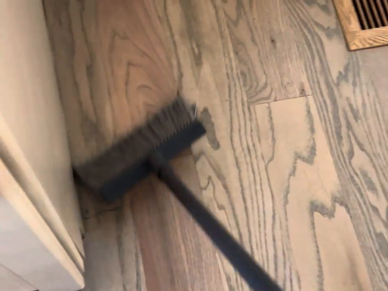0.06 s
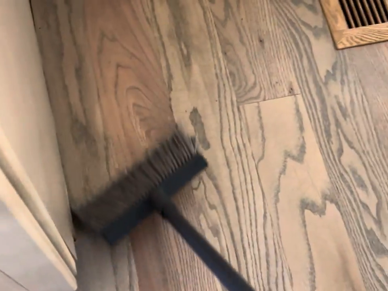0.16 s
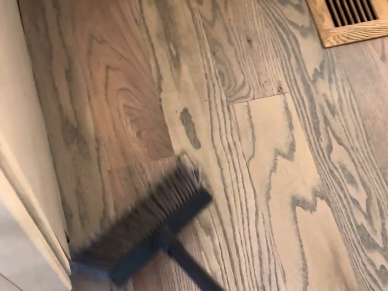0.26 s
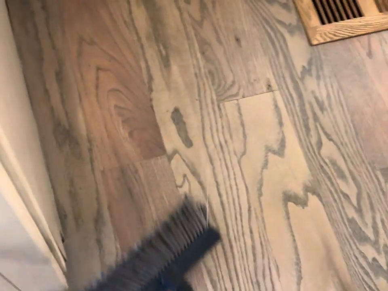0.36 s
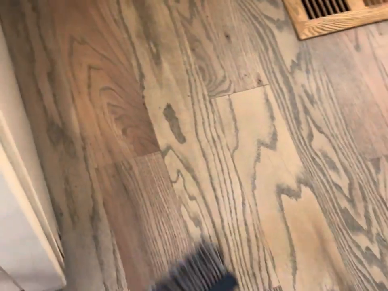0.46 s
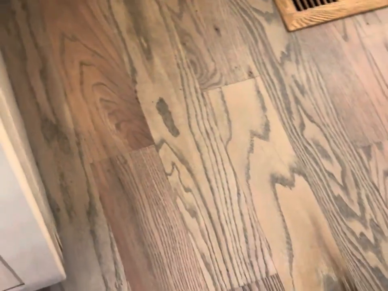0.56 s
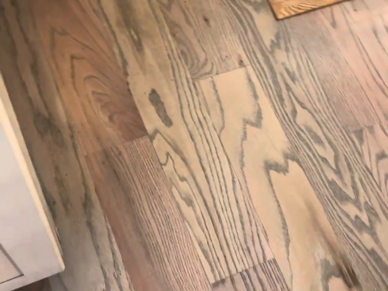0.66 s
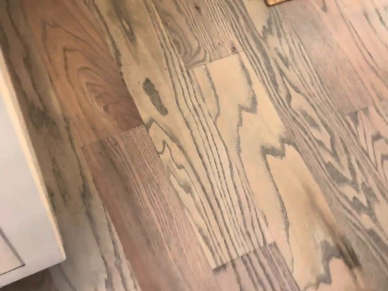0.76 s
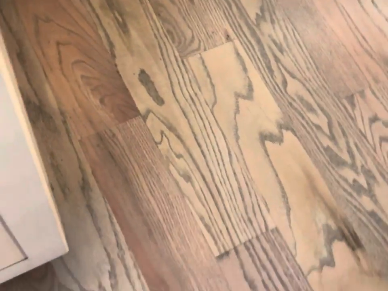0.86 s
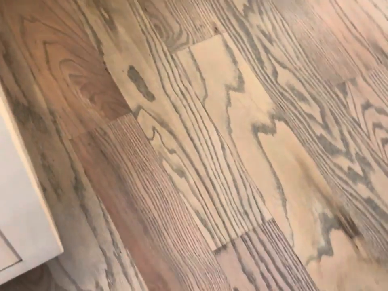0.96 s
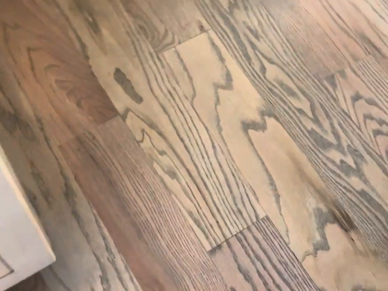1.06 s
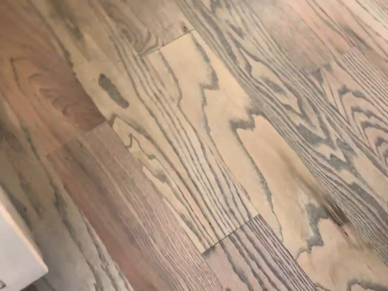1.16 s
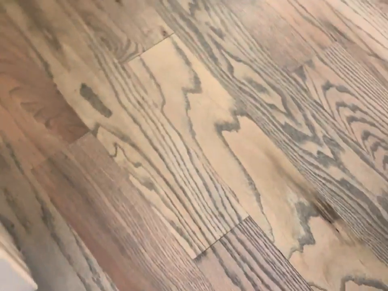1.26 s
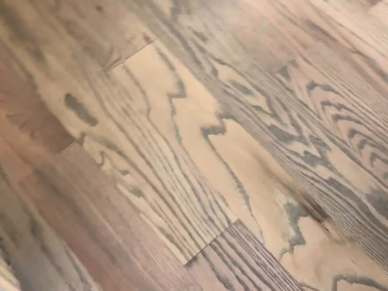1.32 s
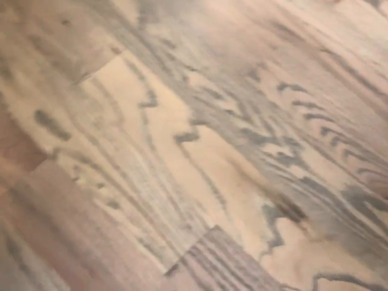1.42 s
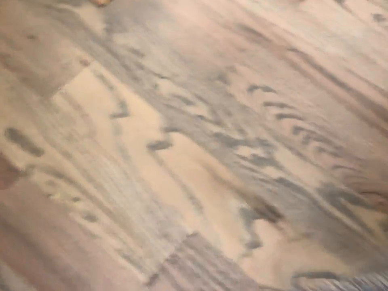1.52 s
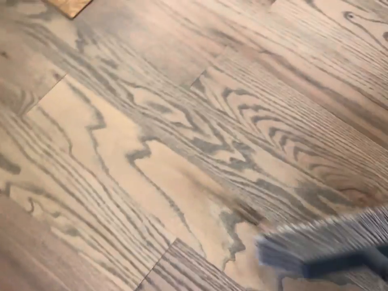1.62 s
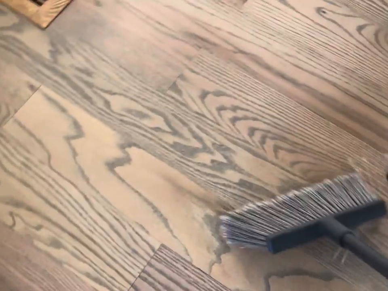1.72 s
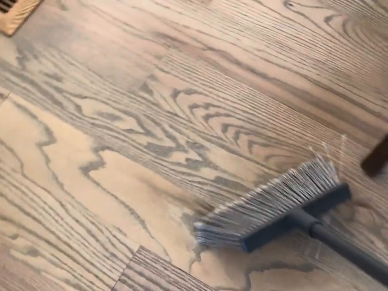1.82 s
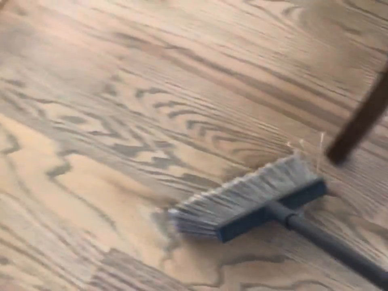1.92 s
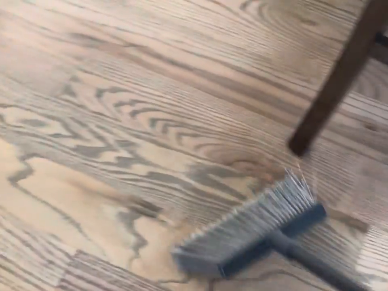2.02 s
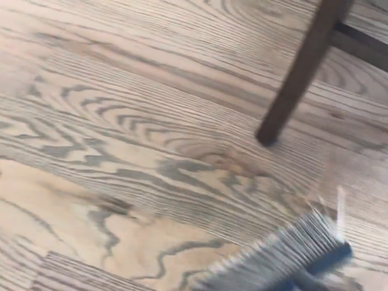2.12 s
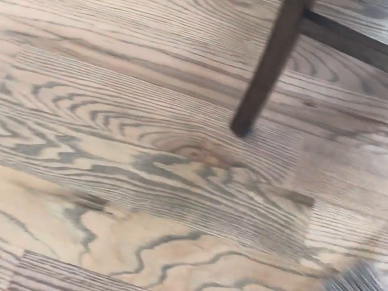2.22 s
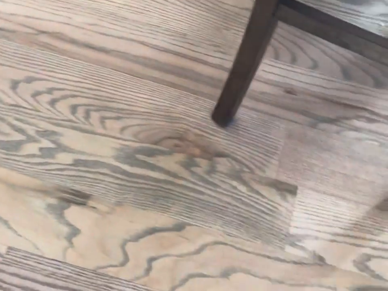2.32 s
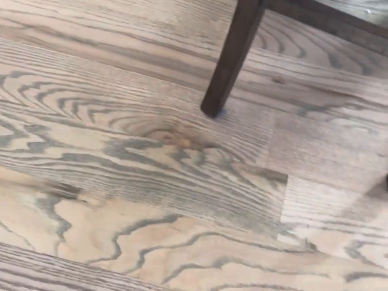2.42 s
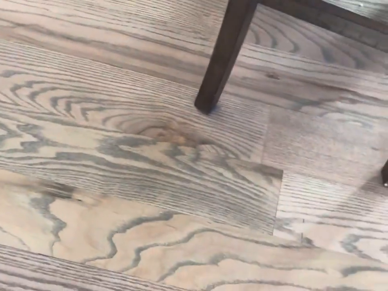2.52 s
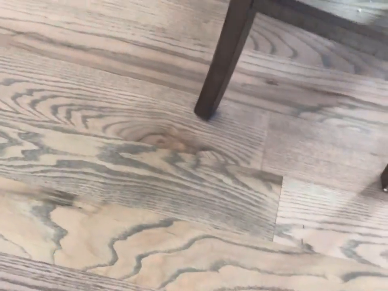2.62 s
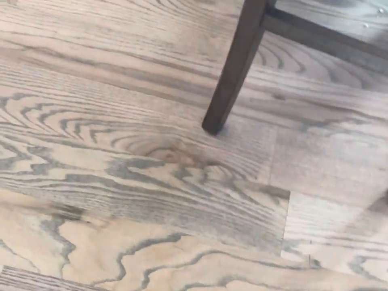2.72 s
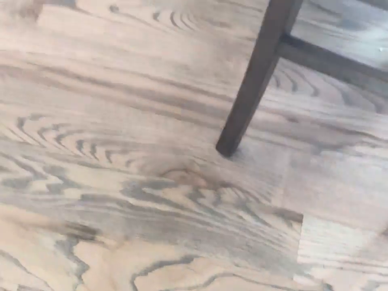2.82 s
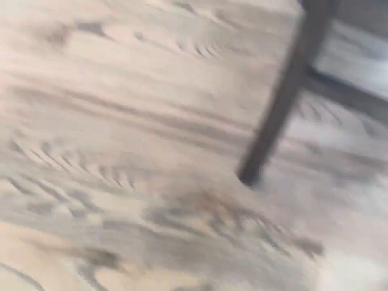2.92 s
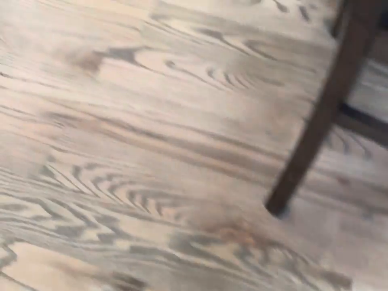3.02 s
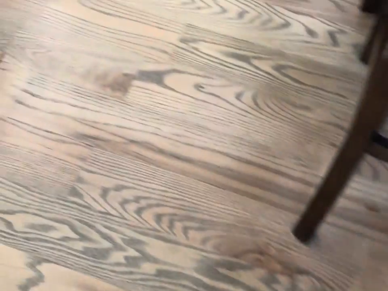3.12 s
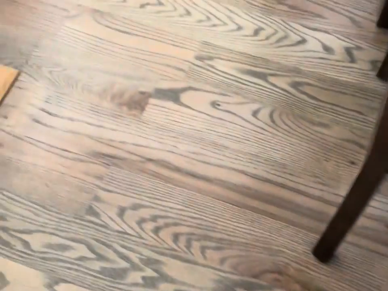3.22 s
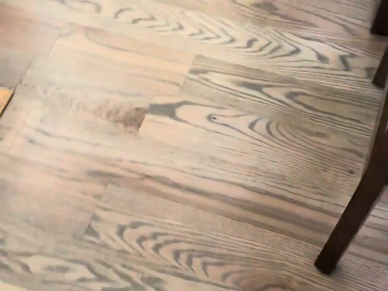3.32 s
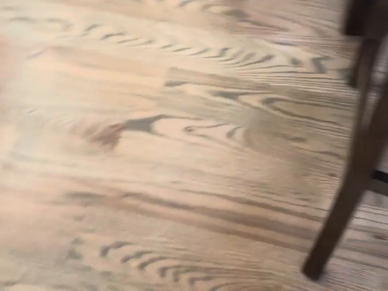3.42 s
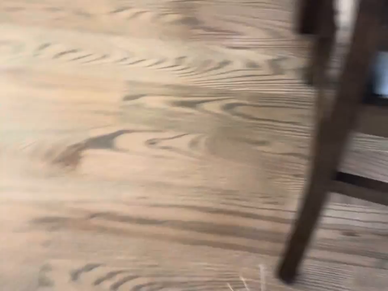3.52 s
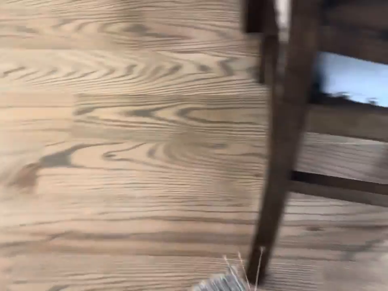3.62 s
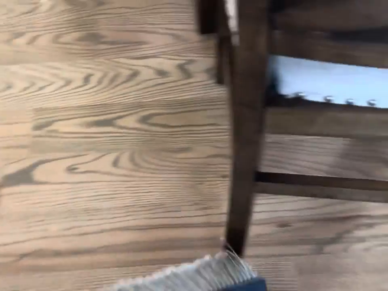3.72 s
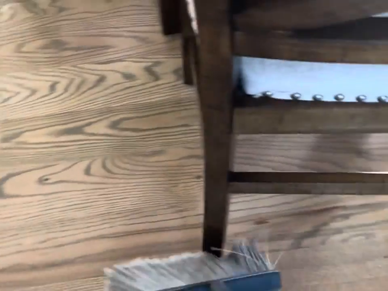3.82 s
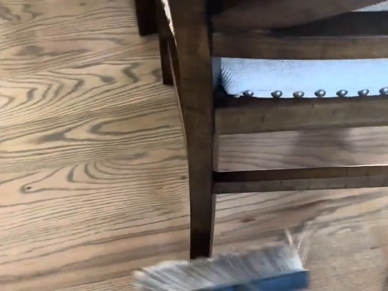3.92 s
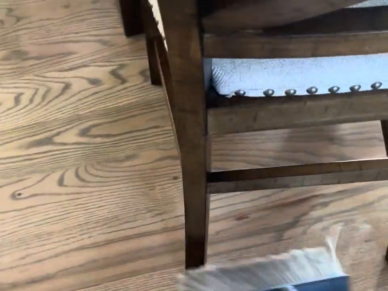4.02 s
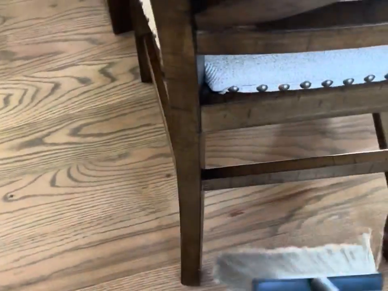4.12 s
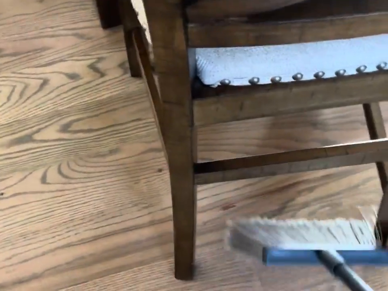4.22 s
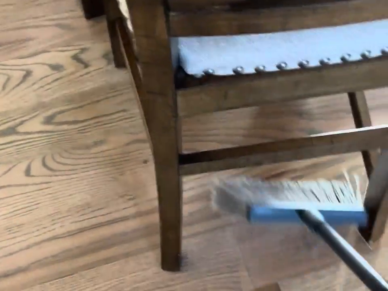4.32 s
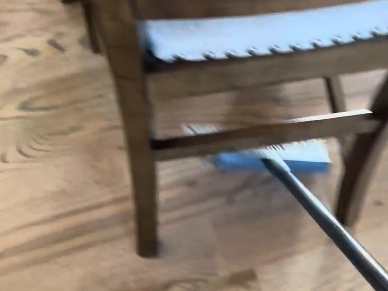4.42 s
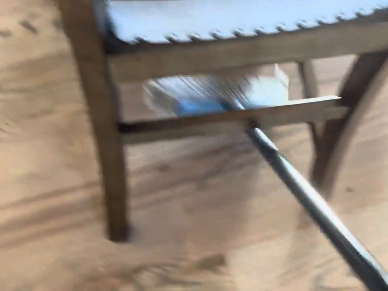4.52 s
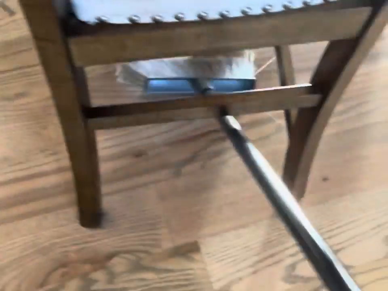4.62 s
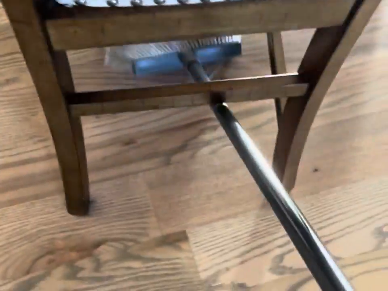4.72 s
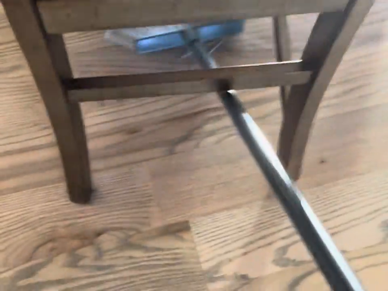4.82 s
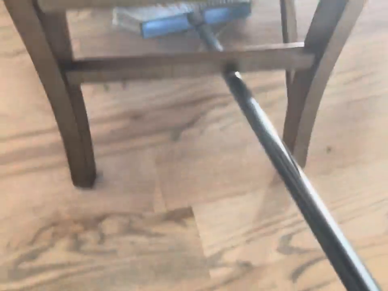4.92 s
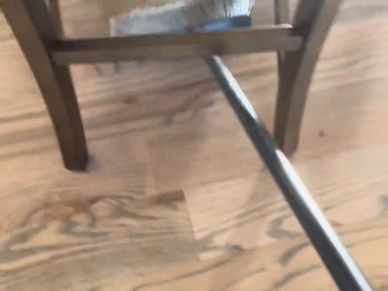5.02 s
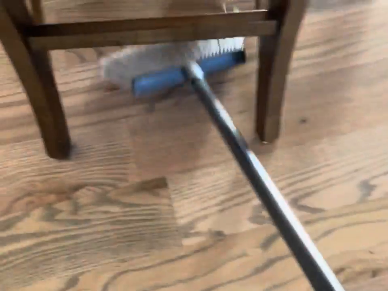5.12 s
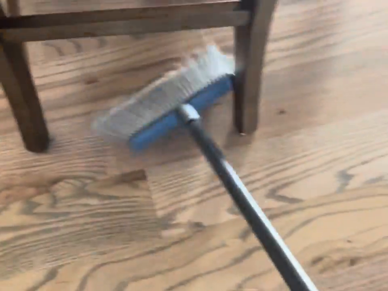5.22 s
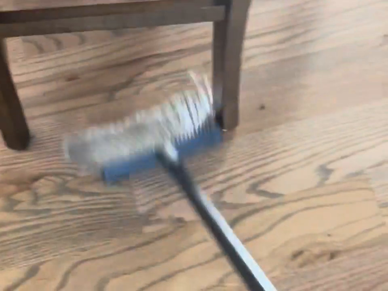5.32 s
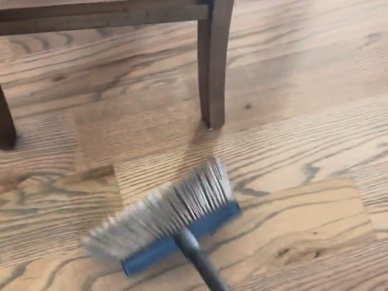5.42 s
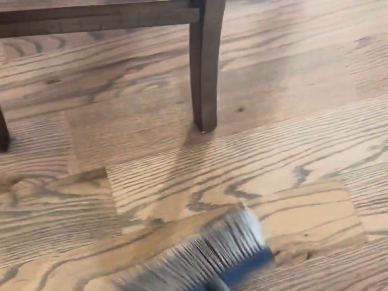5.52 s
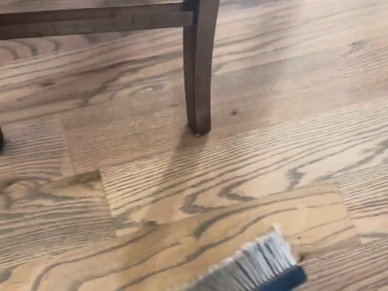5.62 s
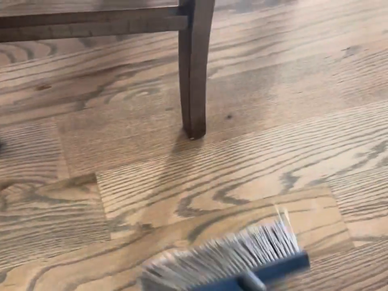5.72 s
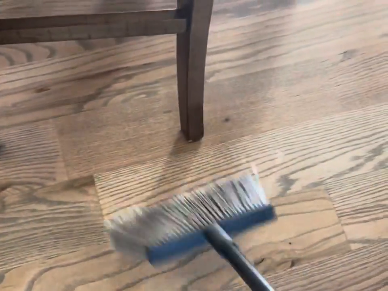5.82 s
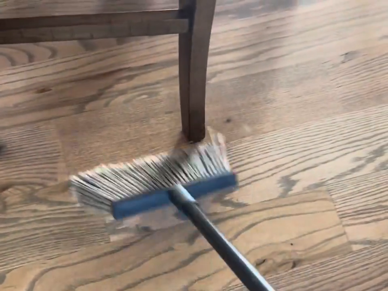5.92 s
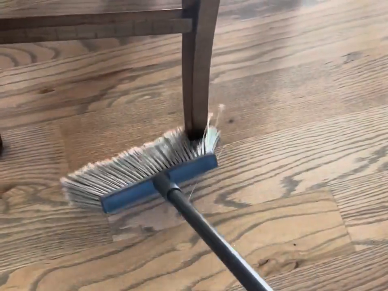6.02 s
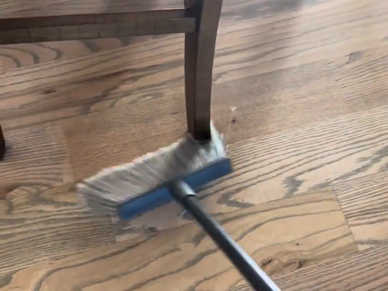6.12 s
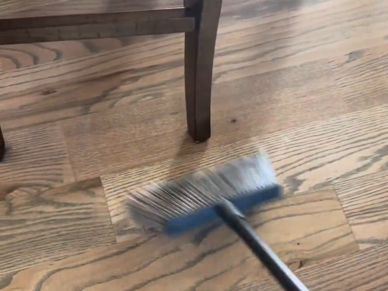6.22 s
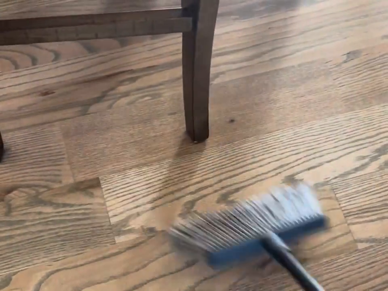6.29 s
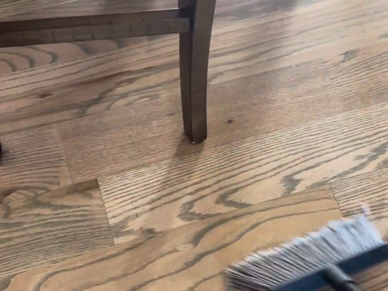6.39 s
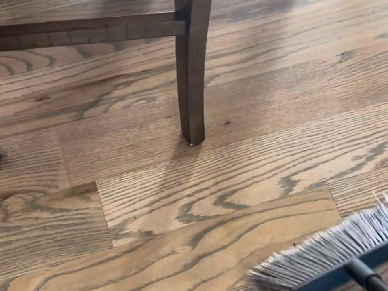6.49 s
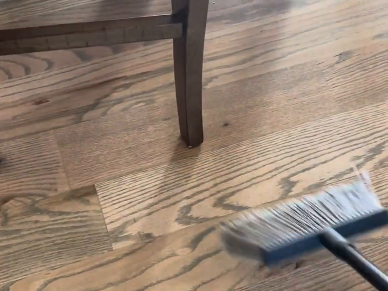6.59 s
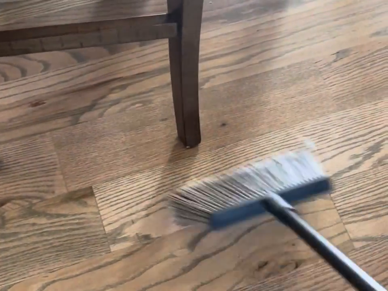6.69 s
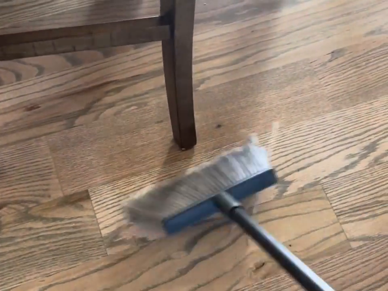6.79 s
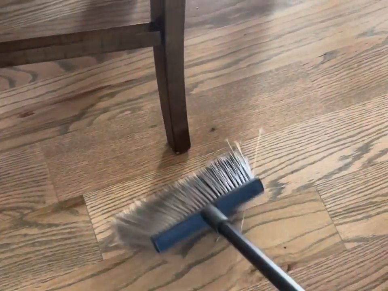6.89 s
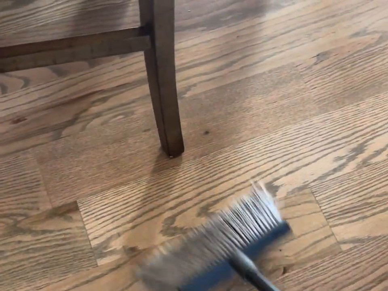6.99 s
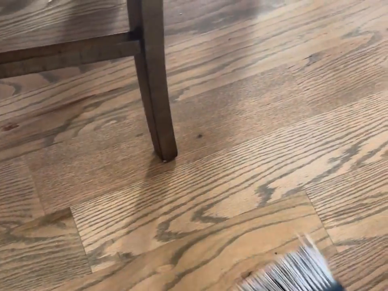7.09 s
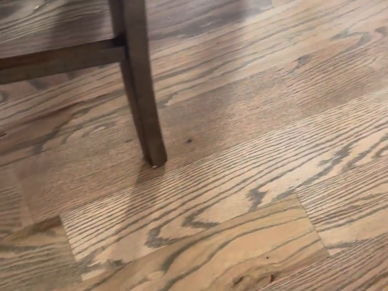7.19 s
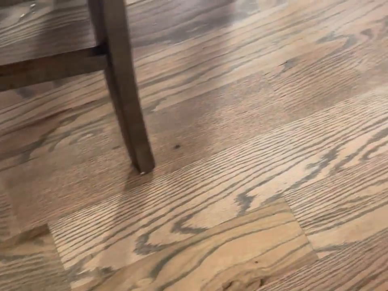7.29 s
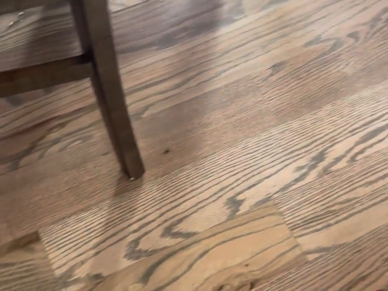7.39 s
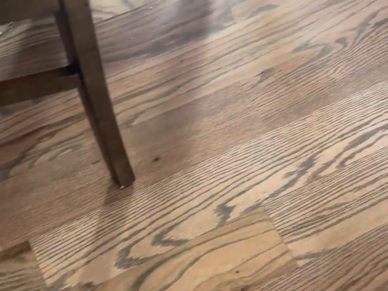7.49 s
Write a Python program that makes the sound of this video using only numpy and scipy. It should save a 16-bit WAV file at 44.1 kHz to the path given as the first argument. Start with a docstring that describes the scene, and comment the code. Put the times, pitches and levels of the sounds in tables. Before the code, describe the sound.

A stiff broom works on a hardwood floor in a bare room with a short live echo, picked up by a handheld phone about a metre away over a steady, faint low rumble. A swish is already under way at 0 s; a longer one builds from 0.3 to 0.9 s with small flicks. Softer, raspier brushes run from 1.0 to 1.9 s, then a stroke swells until about 2.5 s. Sweeping pauses, leaving soft footfalls and a faint tick near 3 s. Light brushes come at 3.4, 3.7 and 4.25 s. At 4.6 and 4.75 s the handle knocks hollowly on a chair rail, rattling; a sharp tick follows at 4.9 s, and the loudest, brightest knock hits a leg at 5.2 s. Quick swishes follow to 6.35 s, with light clacks around 6.0 s. After a soft step at 6.4 s, flicks and short strokes from 6.7 s end in a last hiss at 7.2 s, leaving rumble.

```python
"""A push broom sweeps a hardwood floor in short strokes over a low steady rumble; a bare room rings on.
Bristles hiss as clicks of slipping tips; tufts flick, stiff bristles tick, and steps boom on the floor.
From 4.6 s the broom knocks twice on a chair rail, then on its leg at 5.2 s: decaying wood modes, buzz and snap.
Strokes and flicks go on between, with faint chair contacts at 6.0 s and a last stroke to 7.2 s.
A hand-held phone a metre away hears it all at two microphone ports."""
import sys
import numpy as np
from scipy import signal
from scipy.fft import rfft, irfft
from scipy.io import wavfile
from scipy.ndimage import uniform_filter1d

SR = 44100
rng = np.random.default_rng(int(sys.argv[2]) if len(sys.argv) > 2 else 0)


def master(y):
    """Save y as 16-bit WAV."""
    cut = np.clip(np.atleast_2d(y).T, -1, 1)
    pcm = np.round(cut * 32767)  # scale
    wavfile.write(sys.argv[1], SR, pcm.astype(np.int16))


N = 332954
T = np.arange(N) / SR
HZ = np.fft.rfftfreq(N, 1 / SR)

# Spectra give relative dB: colour() scales the result to rms 1.
# broom strokes: start_s, push_end_s, push_end_hiss_db (before trim), push_rise_db, coast_s, press_rasp_db
STROKES = [(0.0, 0.2, -61.5, -3.5, 0.19, 3.5), (0.288, 0.937, -52.5, 12, 0.019, -1),
           (1.006, 1.33, -102.5, -20, 0.075, 12.5), (1.40, 1.447, -75.5, 14, .04, -1),
           (1.52, 1.64, -106, -2, .04, 12.5), (1.699, 1.773, -62, 5.5, 0.006, 2.5),
           (1.897, 1.993, -74.5, 5, .01, -2), (1.976, 2.451, -51.5, 19, 0.078, -1),
           (3.406, 3.453, -82, -14, 0.11, 3.5), (3.742, 3.808, -66, 25, 0.14, -4.5),
           (4.249, 4.567, -77.5, -3, 0.033, 0.5), (4.583, 4.8, -62, 1, 0.085, -1),
           (4.954, 5.139, -63, 9.5, 1, 2.5), (5.322, 5.405, -52, 11, .005, 7.5),
           (5.514, 5.596, -62.5, 2, 0.066, 1), (5.916, 6.013, -55.5, 33.5, 0.0061, 4.5),
           (6.005, 6.028, -71, -8, 0.075, 9.5), (6.133, 6.16, -60, 10, 0.0054, -0.5),
           (6.216, 6.35, -62, 4.5, 0.069, 0), (6.716, 6.785, -62, 19.5, 0.047, 5.5),
           (6.86, 7.012, -63, 23, .01, 3.5), (6.983, 7.216, -53, 13, 0.12, -0.5)]
# spectrum of fast bristle-tip slips: pitch_hz, density_db_per_hz
HISS_SPECTRUM = [(900, -20), (2500, -6), (4400, -5), (5800, 0), (9000, 0), (13000, -2), (16000, -1.5)]
# spectrum of broom head and boards shaken by the bristles: pitch_hz, density_db_per_hz
RASP_SPECTRUM = [(150, -4), (400, -4), (750, -9), (1000, -1), (1500, 0.5), (2200, -0.5), (2700, -1.5),
                 (3300, -1.5), (4200, -6.5), (5500, -6.5), (9000, -16), (16000, -11.5)]
# ranges in which tufts scratch: low_hz, high_hz
TUFT_BANDS = [(500, 800), (800, 1200), (1200, 1700), (1700, 2300), (2300, 3000), (3000, 3900), (3900, 5000)]
# tufts landing, catching or flicking free: start_s, snap_db, clack_db
FLICKS = [(0.534, -48.5, -49), (0.682, -56, -56), (1.71, -71, -55.5), (1.747, -70, -63),
          (1.817, -55.5, -60), (1.994, -66, -54.5), (2.067, -68, -63), (2.113, -72, -57), (2.179, -67, -55),
          (2.233, -66, -54), (2.337, -68, -59), (3.485, -69, -49), (3.664, -75, -59), (4.264, -70, -61),
          (5.95, -68, -49), (5.958, -62, -65), (5.983, -59, -57), (6.002, -48, -43), (6.126, -67.5, -53),
          (6.729, -67.5, -57.5), (6.744, -58, -70), (6.778, -52, -41), (6.838, -70, -61),
          (6.851, -66, -51.5), (6.916, -70, -68), (6.987, -59, -48)]
# spectrum of a tuft's snap: pitch_hz, density_db_per_hz
TUFT_SNAP_SPECTRUM = [(900, -14), (3000, -7), (4600, -5.5), (7800, 7), (10000, -2), (16000, -2.5)]
# spectrum of the broom head's clack: pitch_hz, density_db_per_hz
CLACK_SPECTRUM = [(120, -17.5), (400, 6), (700, -2.5), (1150, 2), (1600, -7), (2200, -5), (3500, -15),
                  (6000, -16.5), (16000, -28.5)]
# single stiff bristles springing free: start_s, level_db
TICKS = [(2.976, -59), (3.485, -52), (4.179, -66), (4.9372, -40), (6.631, -55)]
# spectrum of one bristle's tick: pitch_hz, density_db_per_hz
TICK_SPECTRUM = [(600, -6), (1800, 4), (2700, -1), (3800, -17), (5500, 15.5), (7500, -6.5), (16000, -11)]
# blows on the chair and rebounds: start_s, place, ring_db, buzz_db, snap_db, floor_boom_db
KNOCKS = [(4.578, "rail", -1.5, -38, -31, -31.5), (4.603, "rail", -13, -52, -55, -42),
          (4.7423, "rail deep", -0.5, -39, -34.5, -41), (4.778, "rail deep", -8, -44, -35, -58),
          (4.935, "rail deep", -31, -55, -52, -62), (5.225, "leg", 0, -24.5, -23.5, -27.5),
          (5.233, "leg", -17, -38.5, -34.5, -38.5), (6.005, "rail deep", -28.5, -50.5, -53, -47),
          (6.013, "leg", -30.5, -50, -42, -39), (6.022, "rail deep", -25.5, -51.5, -58.5, -55),
          (6.033, "leg", -35, -61, -58, -59)]
# contact places: handle on cross rail, handle pushed farther in, head on front leg
PLACES = ("rail", "rail deep", "leg")
# modes of broom against chair: pitch_hz, t60_s, rail_db, rail_deep_db, leg_db
CHAIR_MODES = [(125.7, 0.526, -49.5, -56.5, -36.5), (203.5, 0.28, -39, -37.5, -31),
               (239.3, 0.099, -27.5, -25, -35), (273.4, 0.19, -34.5, -29.5, -39),
               (350.8, 0.309, -42, -38, -35.5), (390, 0.021, -30.5, -23, -59),
               (437.4, 0.089, -14.5, -16.5, -24), (496, 0.033, -27, -24.0, -23),
               (577, 0.027, -18.5, -27.5, -5.5), (610, 0.019, -12.5, -17.5, -4.5),
               (720, 0.012, -13.5, -18.5, -15.5), (734, 0.56, -42, -45, -37), (763, 0.36, -46, -46, -40),
               (790.5, 0.046, -16, -17, -11.5), (809.5, 0.054, -28.5, -24, -13),
               (929, 0.032, -31, -30, -26.5), (1007, 0.022, -27.5, -27, -21.5),
               (1187, 0.071, -30.5, -32.5, -23.5), (1331, 0.062, -35, -36, -28.5),
               (1542, 0.015, -42, -46.0, -17.5), (1787.0, 0.015, -17.5, -40.5, -7.5),
               (1841.4, 0.015, -17.5, -18, -2), (1844.0, 0.03, -31.5, -21, -9),
               (2067, 0.048, -20, -16.5, -6.5), (2072, 0.079, -25.0, -21, -8.5),
               (2200, 0.018, -21.5, -20, -13.5), (2235, 0.067, -37.5, -27.5, -18),
               (2353, 0.03, -27.5, -35.5, -18), (2499.0, 0.0063, -34, -48, -13),
               (2560, 0.069, -30, -38.0, -18.5), (2750, 0.023, -34.5, -40.5, -18.5),
               (2952.0, 0.069, -74, -46.0, -21.5), (3100, 0.0033, -26.5, -40.5, -22.5),
               (3510, 0.023, -63.0, -57.5, -22), (3710, 0.054, -56, -45.5, -32),
               (4020, 0.0035, -41.5, -40, -37), (4760, 0.18, -50, -49.0, -45.5),
               (5035.0, 0.013, -48.0, -45.5, -27.5), (5300, 0.074, -44, -62.5, -72)]
# spectrum of loose joints and close upper wood modes: pitch_hz, density_db_per_hz
BUZZ_SPECTRUM = [(120, -8), (500, 0), (850, -2), (1000, -6), (1600, -6), (2000, -1), (2900, 0), (3600, -3),
                 (4300, -14), (5200, -12), (8000, -25), (16000, -35)]
# spectrum of hard contact: pitch_hz, density_db_per_hz
SNAP_SPECTRUM = [(500, -9), (2000, -1), (5500, 1), (8000, -3), (16000, -5.5)]
# chair sound at the two ports: pitch_hz, left_minus_right_db
CHAIR_BALANCE = [(100, 0), (350, 5), (620, -7), (1200, -4), (2100, -1), (3200, 2), (4500, -3.5), (8000, 0)]
# footsteps: start_s, level_db
STEPS = [(1.149, -39.5), (1.93, -46.5), (2.529, -45.5), (3.404, -43.5), (3.501, -47), (4.188, -61),
         (6.401, -45.5)]
# modes of the sprung floor: pitch_hz, level_db
FLOOR_MODES = [(44, -20.5), (53.5, 0.5), (59, -8), (78, -10.5), (86, -9.5), (99, -17.5), (121, -26)]
# ring of the room: pitch_hz, t60_s, level_db
ROOM = [(60, 0.21, 4), (215.4, 0.61, 0), (330, 0.62, 2.5), (436, 0.59, -1), (600, 0.76, -3.5),
        (760, 0.75, -2), (971, 0.71, -4), (1570, 0.95, -5), (2197, 0.74, -6.5), (3640, 0.73, -5.5),
        (7800, 0.33, -7.5), (16100, 0.33, -18)]
# spectrum of the steady rumble: pitch_hz, density_db_per_hz
RUMBLE_SPECTRUM = [(20, -47.5), (34, 0.5), (110, -6.5), (160, -7.5), (212, -1.5), (265, -6.5), (336, -12.5),
                   (383, -11), (521, -15.5), (640, -12.5), (807, -14), (895, -16.5), (1040, -19),
                   (1130, -20), (2920, -36), (16000, -59.5)]
# diffuse sound at the two ports: pitch_hz, correlation
LIKENESS = [(100, .99), (260, .92), (550, .3), (950, .2), (1800, .7), (2600, .35), (4500, .3), (5900, .93),
            (16000, .97)]
# lead of the left port: pitch_hz, phase_rad
PORT_LEAD = [(0, 0), (250, -.1), (600, -.9), (950, -.9), (1500, -.4), (2200, .5), (2850, 2.6), (4100, .6),
             (4800, 2), (6900, 3.8), (8400, 6.1), (9900, 6.5), (11200, 8.9), (13400, 9.9), (14700, 12.4),
             (16000, 12.6)]

LAND_S, SETTLE_S, SETTLE_DB = 0.02, 0.03, 2.5
FADE_DB_PER_S = 212  # approached as the broom slows and lifts
FLICK_RISE_S, FLICK_DECAY_S = 0.00039, 0.0089
TICK_RISE_S, TICK_DECAY_S = 0.00018, 0.0027
BOUNCE_S, BOUNCE_DB = 0.0056, -7  # blows mirrored by the boards
BOOM_RISE_S, BOOM_DECAY_S = 0.029, 0.16
STEP_RISE_S, STEP_DECAY_S = 0.01, 0.039
RUMBLE_DB = -59
TOP_HZ = 15750


def undb(db):
    """Convert decibels to gain."""
    return 10 ** (np.asarray(db) / 20)


def over_hz(points, hz, axis=1):
    """Interpolate a table column over log frequency."""
    points = np.array(points)
    return np.interp(np.log(np.maximum(hz, 1)), np.log(points[:, 0]), points[:, axis])


def colour(x, points):
    """Shape a signal's spectrum, at rms 1."""
    y = irfft(rfft(x) * undb(over_hz(points, HZ)), N)
    return y / y.std()


def noise(points):
    """Shape steady noise, at rms 1."""
    return colour(rng.standard_normal(N), points)


def walk(rate_hz):
    """Hold random levels for 1 / rate_hz and smooth them twice, at spread 1."""
    hold = int(SR / rate_hz)
    steps = rng.standard_normal(4096)[np.arange(N) // hold]
    smooth = uniform_filter1d(uniform_filter1d(steps, hold), hold)
    return smooth / smooth.std()


def burst(start_s, rise_s, decay_s):
    """Rise linearly to 1, then decay exponentially."""
    age = T - start_s
    return np.clip(age / rise_s, 0, 1) * np.exp(-np.clip((age - rise_s) / decay_s, 0, 40))


def diffuse(a, b):
    """Mix unrelated signals to the ports' correlation: shared mid, opposed side."""
    alike = np.clip(over_hz(LIKENESS, HZ), 0, 1)
    mid = rfft(a, N) * np.sqrt((1 + alike) / 2)
    side = rfft(b, N) * np.sqrt((1 - alike) / 2)
    return irfft([mid + side, mid - side], N)


def slips(rate_hz, scatter_db):
    """Scatter tiny clicks of uneven size in time, at rms 1."""
    hits = rng.random(N) < rate_hz / SR
    clicks = hits * rng.standard_normal(N) * undb(scatter_db * rng.standard_normal(N))
    return clicks / clicks.std()


def bristles(hiss_trim_db=1.0, rasp_db=-63.0, rasp_growth=0.64, firm_db=-60, chatter_db=0.84, snag_db=-12):
    """Tips catch and slip: a faster stroke gains more hiss than rasp, a heavier one more rasp."""
    speed, shaking = 0, 0
    tufts = np.minimum(walk(130), 1)
    for start_s, push_end_s, level_db, rise_db, coast_s, press_db in STROKES:
        shape_db = stroke_db(start_s, push_end_s, rise_db, coast_s, tufts)
        pace = undb(level_db - firm_db + shape_db)  # 1 in a firm stroke
        speed = np.maximum(speed, pace)
        shaking = np.maximum(shaking, pace ** rasp_growth * undb(press_db))
    chatter = undb(chatter_db * walk(70))  # uneven grip on the grain
    hiss = diffuse(*(colour(slips(37000, 0.39), HISS_SPECTRUM) for _ in range(2)))
    # sparse slips: tips that snag in the grain and let go harder
    rasp = diffuse(*(colour(slips(5000, 4.1) + undb(snag_db) * slips(120, 2.5), RASP_SPECTRUM)
                     for _ in range(2)))
    scratch = 0.55 * clumps(diffuse(slips(4000, 1.5), slips(4000, 1.5)))
    fine = hiss * speed * undb(firm_db + hiss_trim_db)
    coarse = (rasp + scratch) * shaking * undb(rasp_db)
    return chatter * (fine + coarse)


def stroke_db(start_s, push_end_s, rise_db, coast_s, tufts):
    """Level relative to push end: ragged landing, steady change in dB, coast and fade."""
    landing = 20 * np.log10(np.clip((T - start_s) / LAND_S, 1e-9, 1))
    # tufts touch down one by one
    settling = SETTLE_DB * tufts * np.exp(-np.clip((T - start_s) / SETTLE_S, 0, 20))
    pushing = rise_db * np.clip((T - push_end_s) / (push_end_s - start_s), -1, 0)
    slowing = np.hypot(np.maximum(T - push_end_s, 0), coast_s) - coast_s
    return landing + settling + pushing - FADE_DB_PER_S * slowing


def clumps(x, rate_hz=55, depth_db=6.5):
    """Tufts grip and let go separately, so each pitch range spurts on its own; rms 1."""
    out = 0
    for edges_hz in TUFT_BANDS:
        band = signal.sosfilt(signal.butter(2, edges_hz, "band", fs=SR, output="sos"), x)
        out = out + band * undb(depth_db * np.minimum(walk(rate_hz), 2))
    return out / out.std()


def flicks():
    """A tuft snaps against boards or chair leg and shakes the broom head: two noise bursts."""
    snap, clack = 0, 0
    for start_s, snap_db, clack_db in FLICKS:
        shape = burst(start_s, FLICK_RISE_S, FLICK_DECAY_S)
        snap = snap + undb(snap_db) * shape
        clack = clack + undb(clack_db) * shape
    return snap * noise(TUFT_SNAP_SPECTRUM) + clack * noise(CLACK_SPECTRUM)


def ticks():
    """A stiff bristle springs free with a dry noise tick."""
    shape = sum(undb(db) * burst(start_s, TICK_RISE_S, TICK_DECAY_S) for start_s, db in TICKS)
    return shape * noise(TICK_SPECTRUM)


def knocks(travel_s=0.0031, buzz_s=0.012, snap_s=0.0011, waver_db=3, waver_s=0.038):
    """Each blow snaps, rings the wood and buzzes its joints; bending waves bring high modes first."""
    ring, buzz, snap = np.zeros(N), 0, 0
    t, rocking = T[:SR // 2], walk(40)
    for start_s, place, ring_db, buzz_db, snap_db, _ in KNOCKS:
        at = int(start_s * SR)
        for k, (hz, t60_s, *place_db) in enumerate(CHAIR_MODES):
            lag_s = travel_s * np.sqrt(400 / hz)  # travel_s holds at 400 Hz
            swell = 1 - np.exp(-np.minimum(t / lag_s, 10) ** 2)
            fade = np.exp(-np.minimum(np.log(1000) * (t - lag_s) / t60_s, 20))
            # the chair rocks on its feet: each mode dies away unevenly
            offset = rng.integers(N - len(t))
            waver = rocking[offset:][:len(t)] * (1 - np.exp(-(t / waver_s) ** 2))
            tone = np.sin(2 * np.pi * hz * (t - lag_s))
            mode = swell * fade * undb(waver_db * (waver - 0.5)) * tone
            gain = undb(ring_db + place_db[PLACES.index(place)])
            ring[at:at + len(t)] += (-1) ** k * gain * mode
        buzz = buzz + undb(buzz_db) * burst(start_s, 0.00077, buzz_s)
        snap = snap + undb(snap_db) * burst(start_s, 0.0001, snap_s)
    mirrored = undb(BOUNCE_DB) * np.interp(T - BOUNCE_S, T, ring)
    uneven = undb(3.5 * walk(220) + 0.5)
    return ring + mirrored + buzz * uneven * noise(BUZZ_SPECTRUM) + snap * noise(SNAP_SPECTRUM)


def rattles(rattle_db=-6.5, fade_s=0.066, last_s=0.12, contact_s=0.0054):
    """The loose handle chatters in its socket: eight light contacts per blow, later ones weaker."""
    delays_s = 0.009 + last_s * rng.random(size=(len(KNOCKS), 8))
    hits = np.zeros(N)
    for (start_s, _, _, buzz_db, *_), row in zip(KNOCKS, delays_s):
        for delay_s in row:
            hits[int((start_s + delay_s) * SR)] += undb(buzz_db + rattle_db) * np.exp(-delay_s / fade_s)
    contacts = signal.lfilter([1], [1, -np.exp(-1 / (contact_s * SR))], hits)
    return contacts * noise(BUZZ_SPECTRUM)


def towards_chair(x):
    """The phone's body shades one port or the other, depending on pitch."""
    return irfft(rfft(x) * undb(np.outer([1, -1], over_hz(CHAIR_BALANCE, HZ) / 2)), N)


def thumps():
    """Blows and steps swing the floor on its joists in a few close, beating modes."""
    loads = [(start_s, db, BOOM_RISE_S, BOOM_DECAY_S) for start_s, *_, db in KNOCKS]
    loads += [(start_s, db, STEP_RISE_S, STEP_DECAY_S) for start_s, db in STEPS]
    out, t = np.zeros(N), T[:SR]
    swing = sum((-1) ** k * undb(db) * np.sin(2 * np.pi * hz * t)
                for k, (hz, db) in enumerate(FLOOR_MODES))
    for start_s, db, rise_s, decay_s in loads:
        at = int(start_s * SR)
        span = slice(at, at + SR)
        out[span] += undb(db) * swing * burst(start_s, rise_s, decay_s)[span]
    return signal.sosfilt(signal.butter(4, 38, "high", fs=SR, output="sos"), out)


def room(x, wet_db, gap_s=0.004, early=0.5, early_s=0.024):
    """Reflections, strongest at first from near floor and furniture: noise decaying by band."""
    t, hz = T[:SR], np.fft.rfftfreq(SR, 1 / SR)
    spectra, tails = rfft(rng.standard_normal((2, SR))), 0
    arrival = np.clip(t / gap_s - 1, 0, 1) * (1 + early * np.exp(-t / early_s))
    for centre_hz in 2 ** np.arange(5, 14.1, 0.25):
        inside = abs(np.log2((hz + 1) / centre_hz)) < 1 / 8  # quarter-octave band
        tau_s = over_hz(ROOM, centre_hz) / np.log(1000)
        level = np.sqrt(2 / (tau_s * SR)) * undb(over_hz(ROOM, centre_hz, axis=2))
        fade = arrival * np.exp(-t / tau_s) * level
        band = irfft(spectra * inside, SR) * fade
        # set each band's energy exactly
        energy = np.sum(band ** 2, axis=1, keepdims=True)
        tails = tails + band * np.sqrt(inside.mean() * np.sum(fade ** 2) / energy)
    response = diffuse(*even(tails))[:, :SR]
    return undb(wet_db) * signal.fftconvolve(x[None], response, axes=1)[:, :N]


def even(response, narrow_hz=25, broad_hz=300):
    """Soften pitches that stick out of a one-second response; keep its first three quarters."""
    spectrum = rfft(response)  # bins 1 Hz apart
    narrow = uniform_filter1d(abs(spectrum), int(narrow_hz))
    broad = uniform_filter1d(abs(spectrum), int(broad_hz))
    softened = spectrum * np.sqrt((abs(broad) + 1e-9) / (abs(narrow) + 1e-9))
    return irfft(softened, SR)[:, :3 * SR // 4]


def rumble(split_hz=160, bass_wander_db=2, wander_db=0.44):
    """Low background of the house: shaped noise whose bass wavers more than the rest."""
    steady = diffuse(noise(RUMBLE_SPECTRUM), noise(RUMBLE_SPECTRUM)) * undb(RUMBLE_DB)
    bass = signal.sosfiltfilt(signal.butter(2, split_hz, fs=SR, output="sos"), steady)
    return bass * undb(bass_wander_db * walk(4.8)) + (steady - bass) * undb(wander_db * walk(10))


def scene():
    """Sum broom, chair and floor, the room's echoes and the rumble."""
    sweep, taps, tips = bristles(), flicks(), ticks()
    blows = knocks() + rattles()
    echo_send = blows + undb(1.5) * taps + undb(-1.5) * tips + undb(1.5) * sweep[0]
    direct = sweep + taps + tips + towards_chair(blows) + thumps()
    return direct + room(echo_send, wet_db=-1.5) + rumble()


def record(dry):
    """The two ports hear each pitch a little out of step; the top is cut."""
    lead_rad = np.interp(HZ, *np.transpose(PORT_LEAD))
    ports = rfft(dry) * np.exp(1j * np.outer([1, -1], lead_rad / 2))
    top_cut = signal.ellip(14, 0.2, 80, TOP_HZ, fs=SR, output="sos")
    return signal.sosfilt(top_cut, irfft(ports, N))


dry = scene()
out = record(dry)
master(out)
```